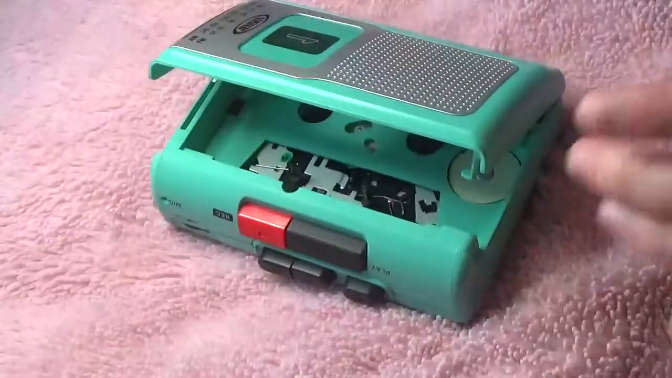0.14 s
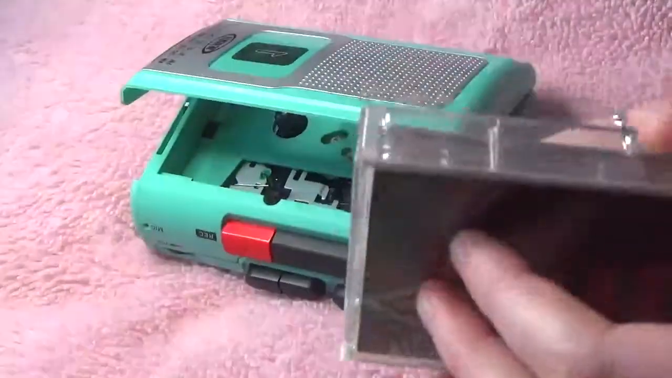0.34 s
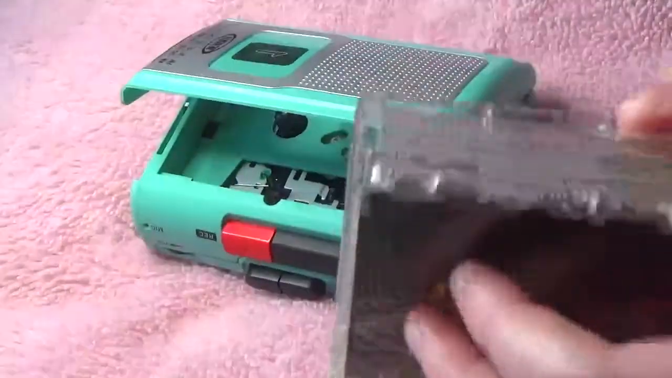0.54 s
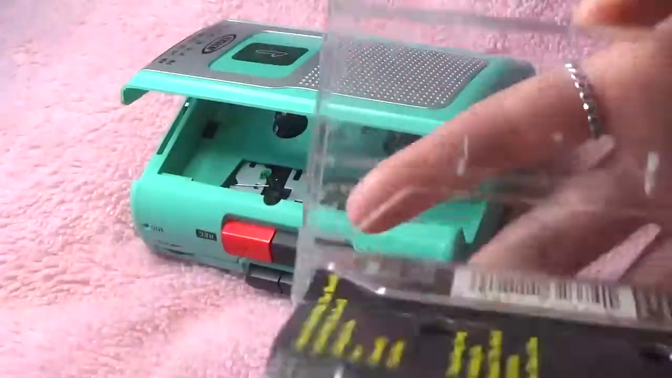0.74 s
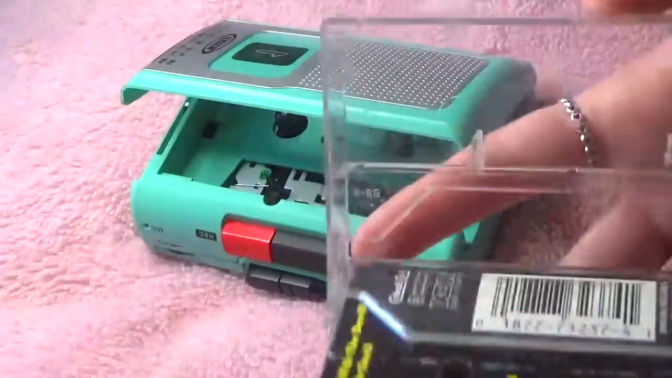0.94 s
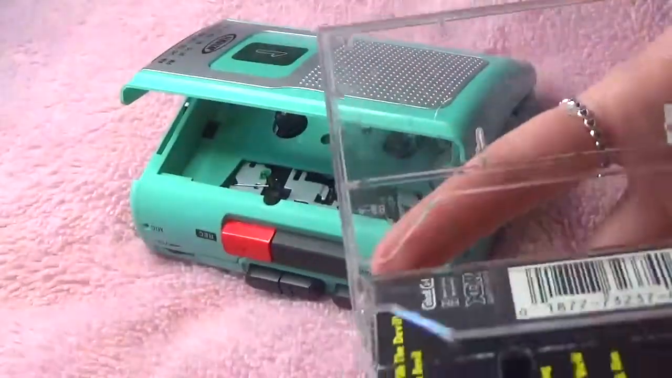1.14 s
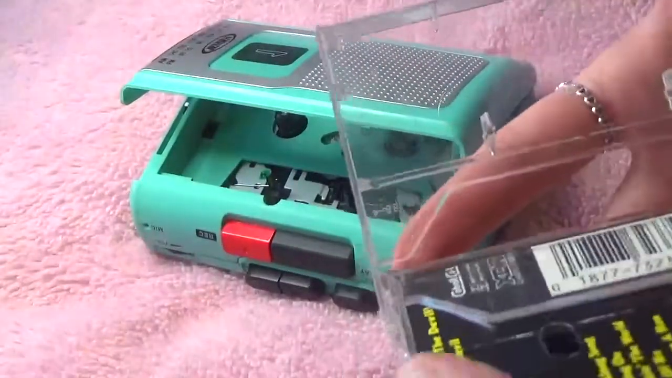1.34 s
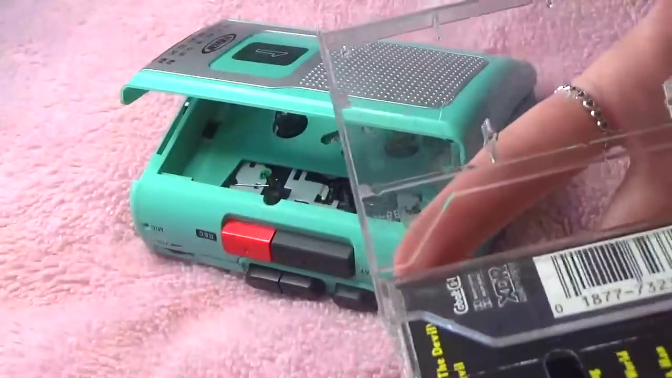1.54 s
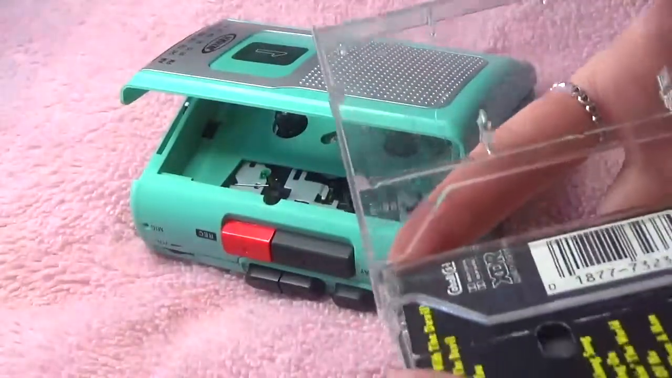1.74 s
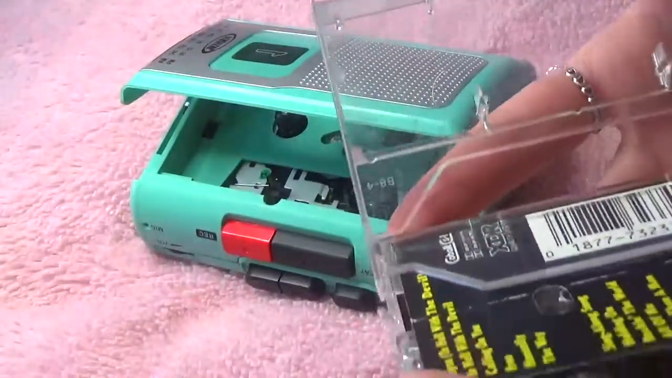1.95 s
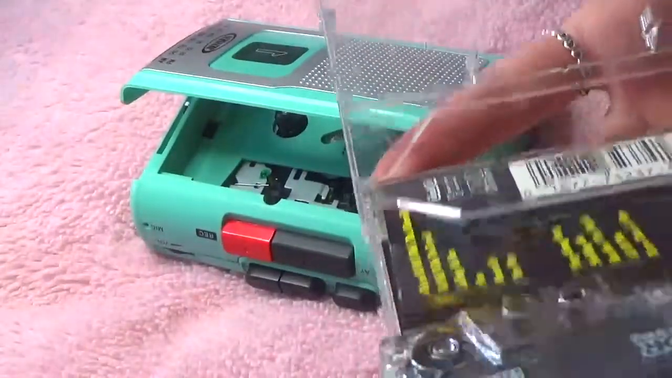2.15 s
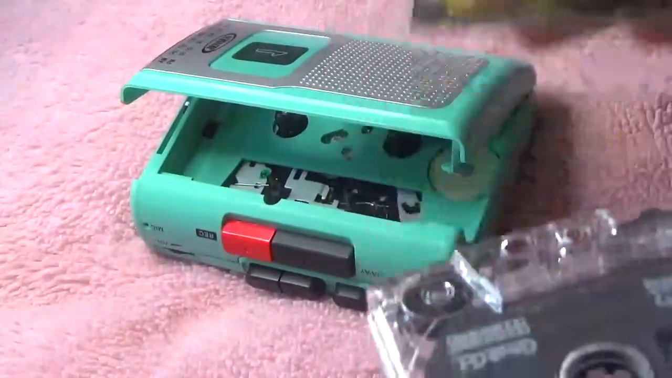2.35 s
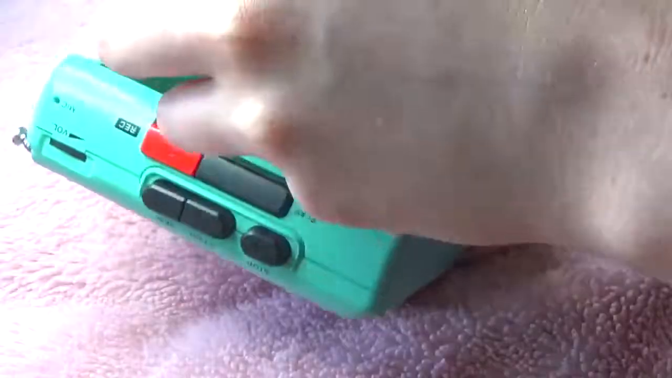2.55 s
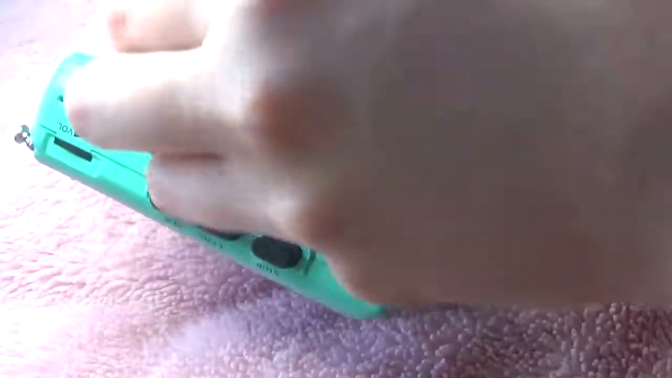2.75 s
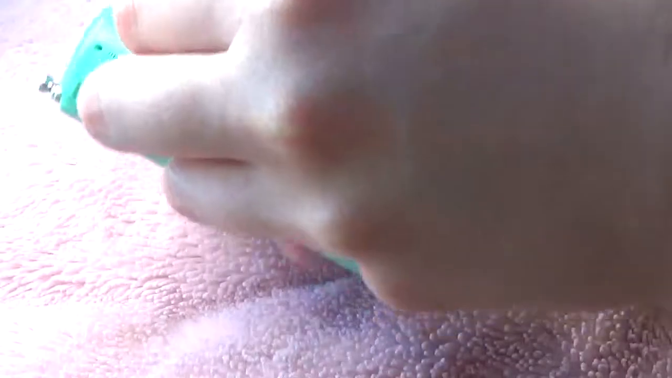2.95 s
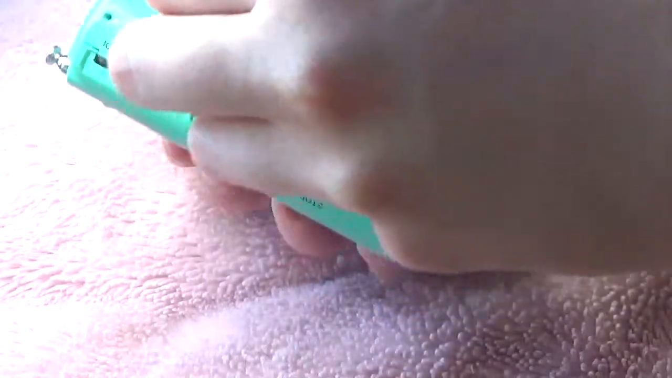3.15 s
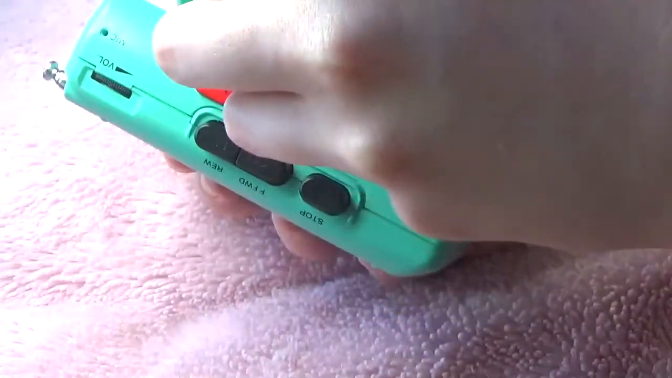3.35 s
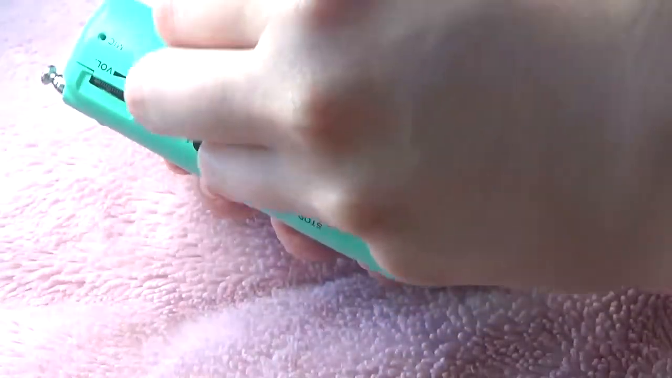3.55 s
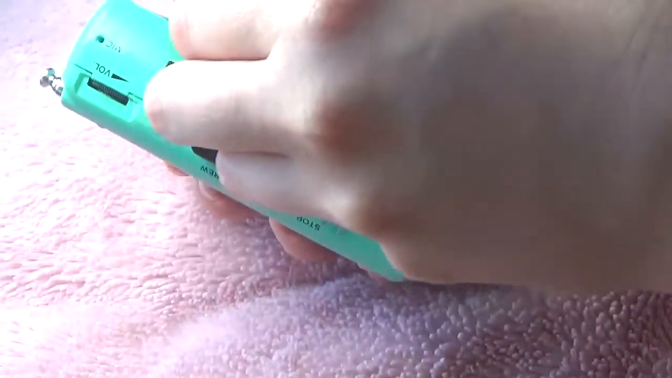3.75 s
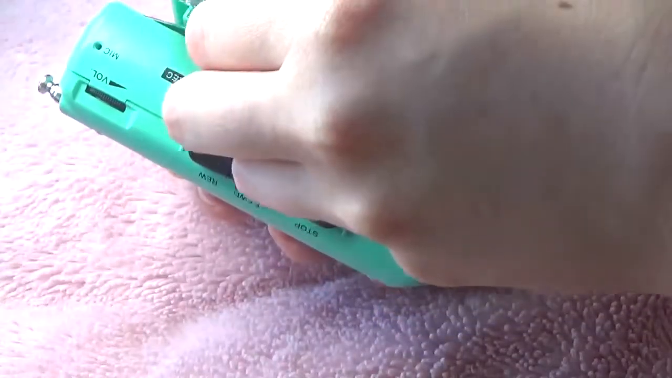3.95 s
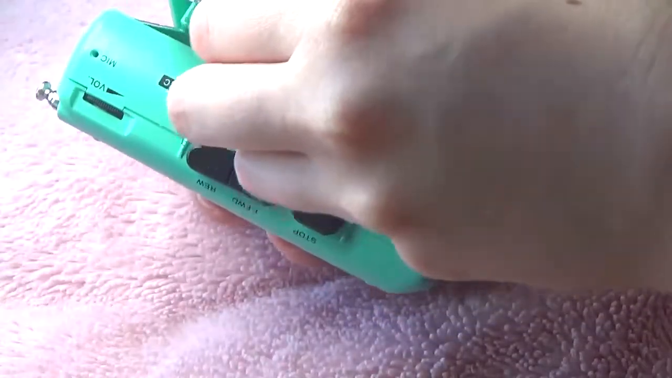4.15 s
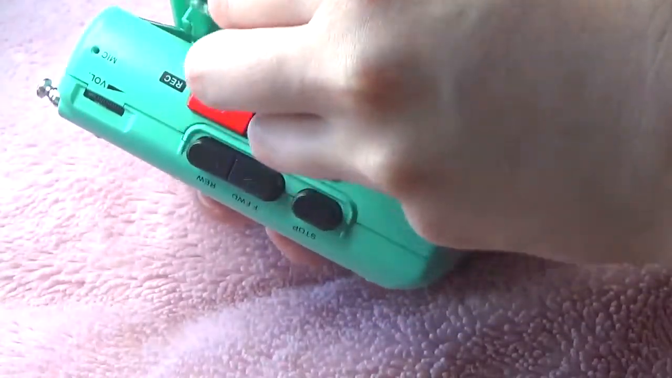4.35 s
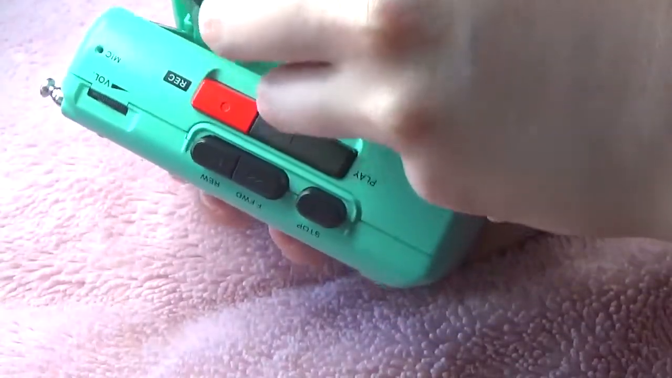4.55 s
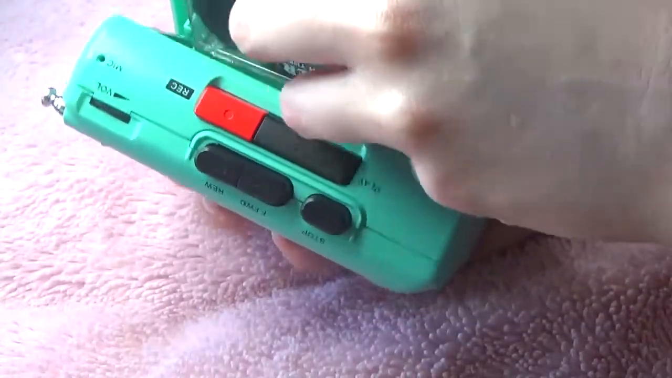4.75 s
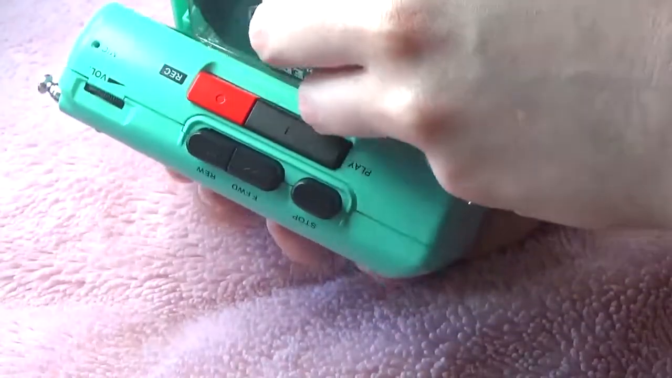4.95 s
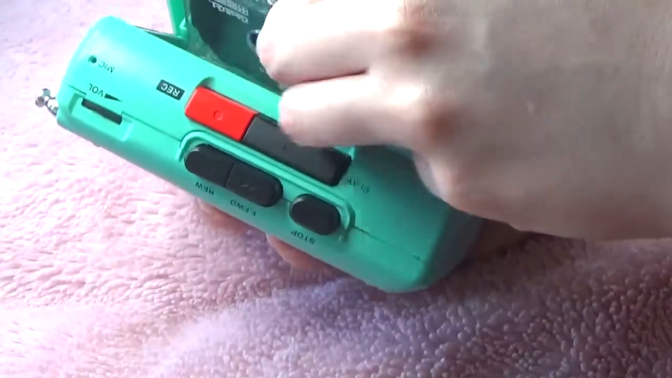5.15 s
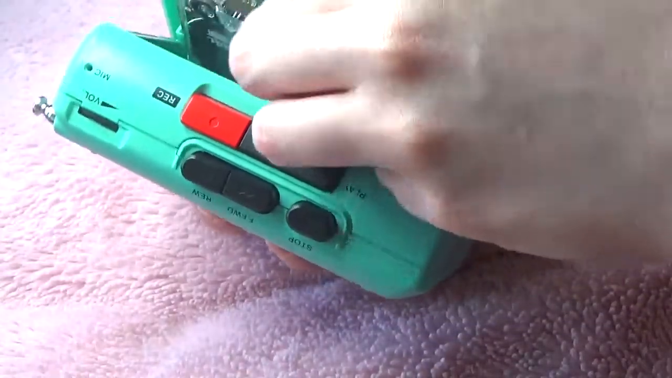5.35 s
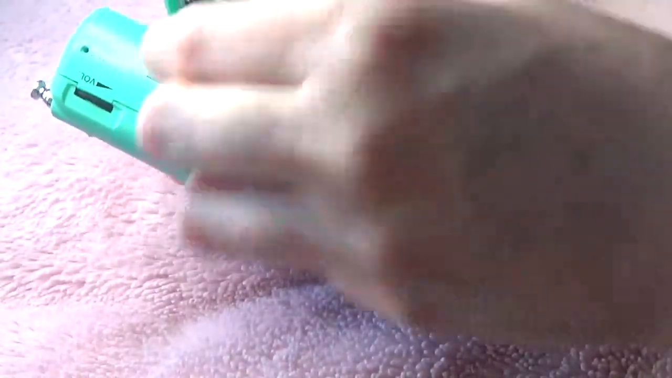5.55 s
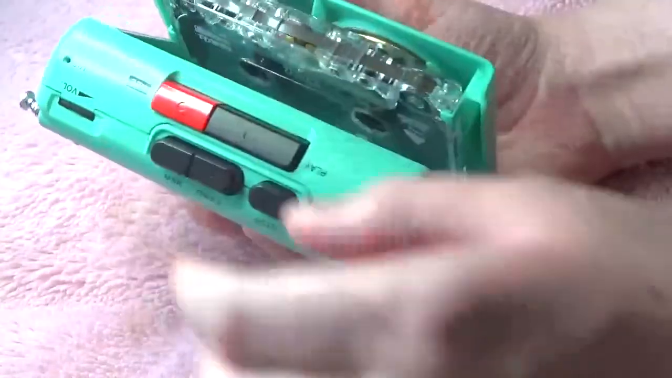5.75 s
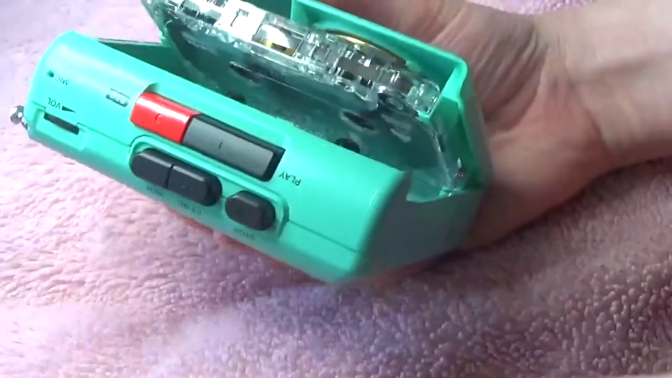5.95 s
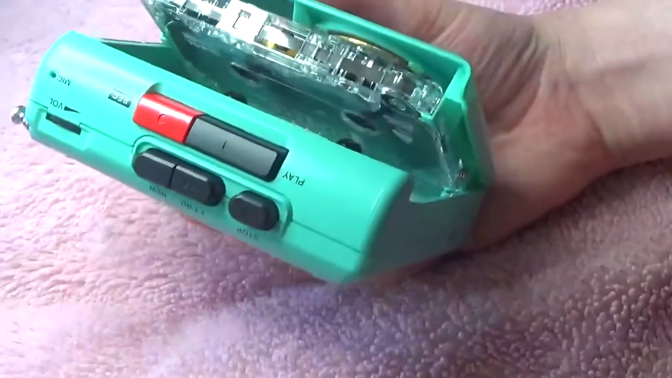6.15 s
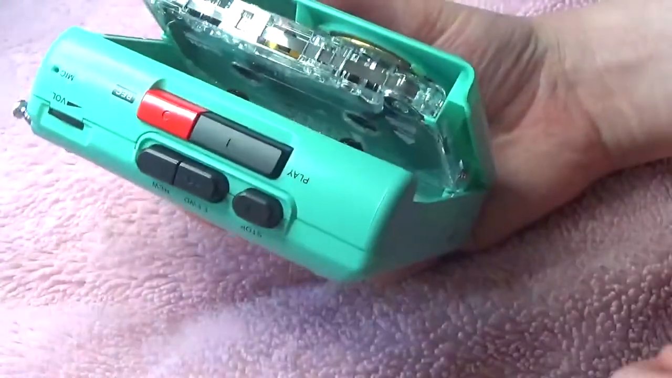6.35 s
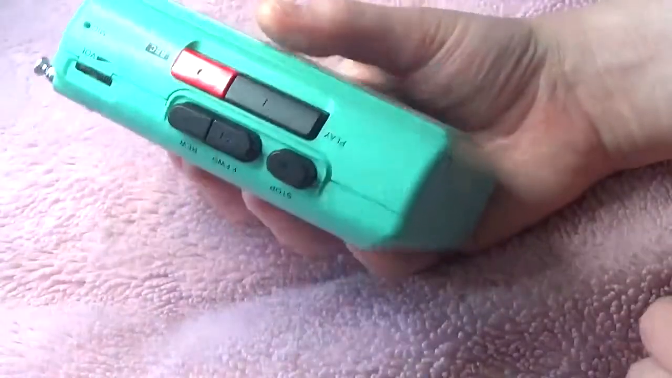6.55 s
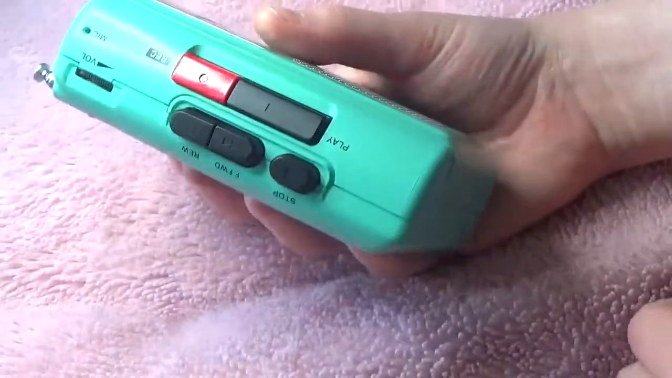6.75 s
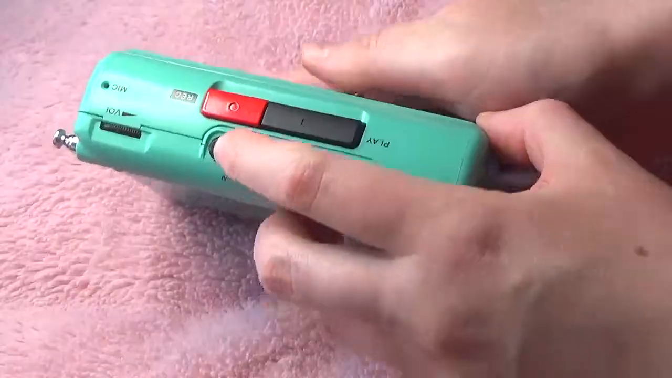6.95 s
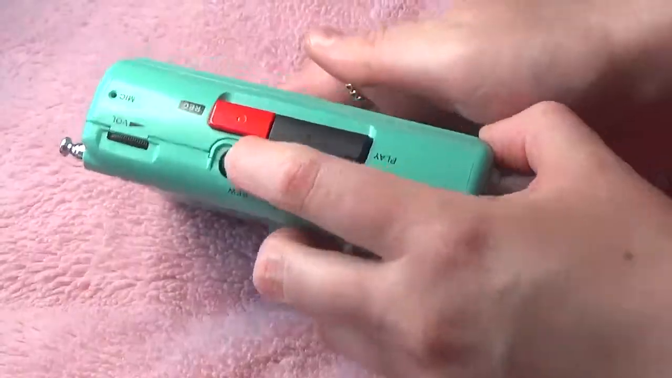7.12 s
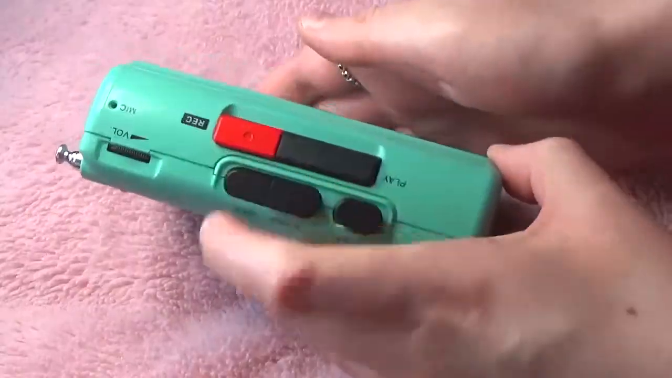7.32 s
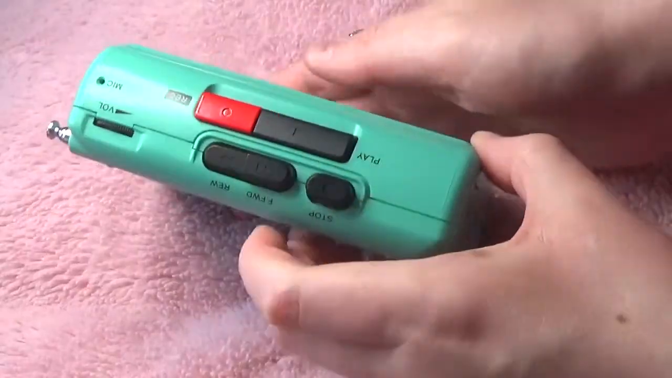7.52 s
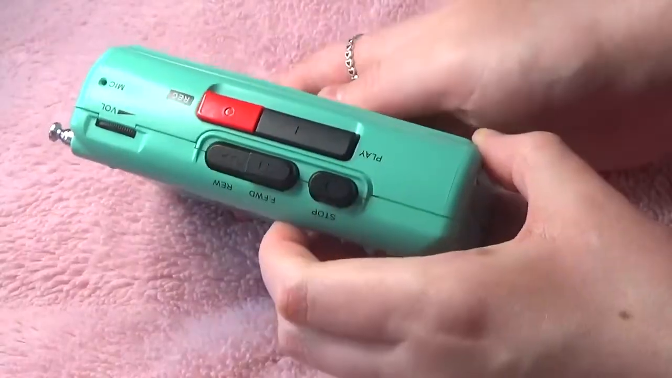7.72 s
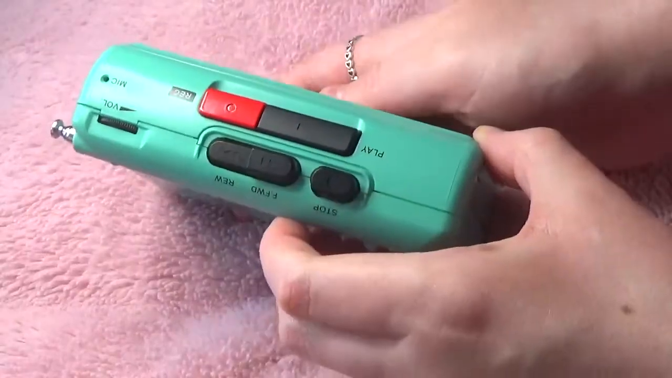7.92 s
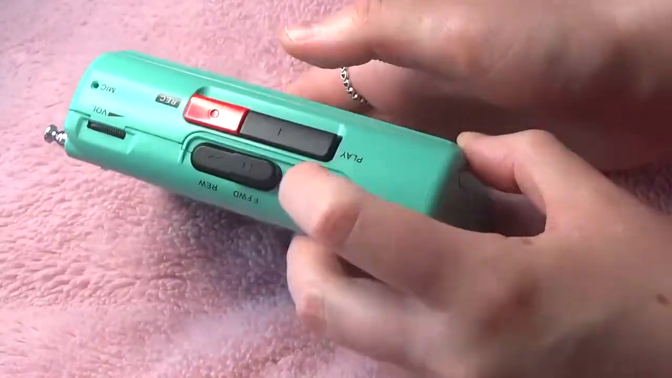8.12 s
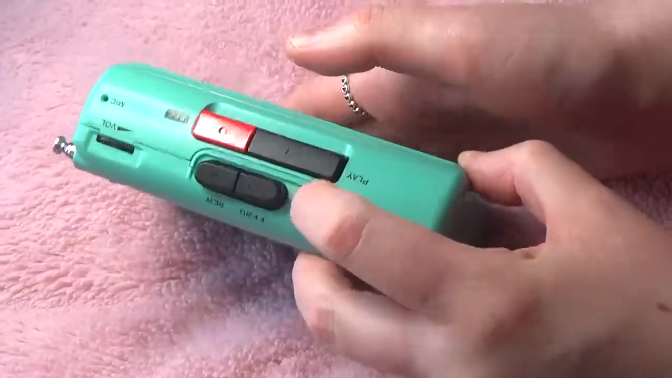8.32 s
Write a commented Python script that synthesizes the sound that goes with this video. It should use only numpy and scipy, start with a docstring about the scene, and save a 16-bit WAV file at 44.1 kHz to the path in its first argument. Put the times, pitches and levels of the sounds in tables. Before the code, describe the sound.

Close handling of a plastic cassette case and small player: clacks, a scraping tape slide, a lid snapping shut, key clicks and a brief motor whir.

```python
"""Tape loaded into a hand-held player

A tape slides out of its plastic case and into a small player on a towel; the lid snaps shut, a key clicks down,
the motor winds for a second and runs down, and a key clicks just after. Contacts are noise bursts through plastic
resonances, hands on skin and cloth are patchy noise, the slide is noise bands on moving pitches, the motor is
noise through gear resonances. The quiet room is damped; a camera close by hums, hisses and ticks once a frame."""
import sys
import numpy as np
from scipy import signal
from scipy.fft import rfft, irfft, next_fast_len
from scipy.io import wavfile
from scipy.ndimage import uniform_filter1d, map_coordinates

SR = 44100
rng = np.random.default_rng(int(sys.argv[2]) if len(sys.argv) > 2 else 0)


def master(y):
    """Save y as 16-bit WAV."""
    cut = np.clip(np.atleast_2d(y).T, -1, 1)
    pcm = np.round(cut * 32767)  # scale
    wavfile.write(sys.argv[1], SR, pcm.astype(np.int16))


N = 369558

# Camera air and circuit hiss. Each row: frequency in Hz, relative density in dB per Hz.
AIR_SPECTRUM = [(26, -23), (45, -4), (70, -6.5), (124, -10), (225, -13), (311, -15), (516, -16), (982, -18),
                (2410, -23), (2580, -25), (3180, -23), (3480, -26.5), (11000, -32.5), (14300, -64.5),
                (22000, -120)]
# Left-right correlation of that hiss. Each row: frequency in Hz, correlation from 0 to 1.
AIR_CORRELATION = [(60, 1.0), (170, 0.92), (490, 0.15), (1410, 0.038), (4030, 0.19), (11500, 0.92)]
# Camera hum. Each row: frequency in Hz, width in Hz, level in dB.
HUM_LINES = [(24, 10, -65.5), (119, 20, -68.5), (1001, 25, -81)]
# Low bump. Each row: centre in seconds, frequency in Hz, peak in dB, half length in seconds.
LOW_BUMPS = [(7.694, 88, -49, 0.018)]
# Wandering tone of the camera tick. Each row: time in seconds, frequency in Hz, mean level in dB.
TICK_TONE = [(0, 2600, -68), (3.12, 2620, -66), (3.25, 2620, -78), (4.6, 3050, -76), (5.3, 3080, -67),
             (6.4, 3150, -68), (6.7, 3410, -64), (6.87, 3430, -63), (6.95, 3450, -76), (8.4, 3450, -76)]
# Room decay. Each row: frequency in Hz, T60 in seconds.
ROOM_DECAY = [(200, 0.21), (1500, 0.13), (10000, 0.11)]
# Where the hands work. Each row: time in seconds, left over right in dB.
HANDS_PAN = [(0, -1), (2.3, -1.8), (2.55, .9), (3.5, .1), (8.4, .5)]
# Resonances of the running deck. Each row: frequency in Hz, width in Hz, relative level in dB.
GEAR_MODES = [(770, 240, 1), (1040, 340, 0), (2120, 260, 2), (2700, 600, -6), (3600, 420, 3),
              (8100, 900, -9), (9000, 600, -5), (10100, 300, -6)]
# Blows pushing the whole object into palm or towel. Each row: start in seconds, level in dB before THUD_TRIM_DB.
THUD_BLOWS = [(.518, -42.5), (2.168, -48), (2.584, -34.5), (3.837, -39.5), (4.02, -43.5), (4.109, -46),
              (4.355, -47), (4.395, -42.5), (4.603, -45.5), (4.644, -43), (5.085, -50), (5.249, -45),
              (5.292, -48), (6.503, -35.5), (6.544, -33), (7.036, -49)]
# Brushing on skin, case and cloth; the faint last row is the motor running down.
# Each row: start in seconds, end in seconds, hiss in dB, scrape in dB.
BRUSH_STROKES = [(-.02, 0.298, -61, -65.5), (0.356, 0.418, -62, -62), (.63, 0.866, -60.5, -57.5),
                 (0.927, 0.987, -54, -54), (1.032, 1.286, -52, -58), (1.312, 1.401, -67, -67),
                 (1.445, 1.5, -64.5, -68.5), (2.22, 2.374, -60, -60), (2.386, 2.47, -60.5, -57),
                 (2.538, 2.607, -63, -57), (4.986, 5.077, -64, -67), (5.175, 5.24, -60.5, -60.5),
                 (5.639, 5.891, -59, -65.5), (6.099, 6.255, -65.5, -71), (8.16, 8.216, -71, -68)]
# Skin hiss. Each row: frequency in Hz, relative density in dB per Hz.
SKIN_SPECTRUM = [(1760, -48.5), (3000, -9), (3980, -19), (4460, -9), (4870, -7), (6280, -7), (8850, 1),
                 (11000, -5.5), (14300, -45.5), (22000, -120)]
# Tape case under a finger. Each row: frequency in Hz, width in Hz, relative level in dB.
CASE_MODES = [(1800, 170, -1), (2580, 130, -4), (3700, 200, 0), (4400, 200, -3), (4950, 150, -7)]
# Tape leaving its case between two air pockets. Each row: time in seconds, hiss in dB, scrape in dB,
# shrinking pocket in Hz, growing pocket in Hz.
TAPE_SLIDE = [(1.62, -64.5, -70, 1100, 3390), (1.71, -41.5, -52, 1137, 3320),
              (1.82, -49, -57.5, 1205, 3247), (1.93, -44.5, -51.5, 1422, 3220),
              (2.0, -41, -45.5, 1750, 3000), (2.09, -46.5, -43.5, 1850, 2250),
              (2.135, -41.5, -41, 1795, 1362), (2.17, -62, -55, 1810, 1250)]
# Plastic on plastic. Each row: start in seconds, hollow knock, clack and tick in dB before CONTACT_TRIM_DB,
# rise in ms (11 dB gained in that time), T60 in ms.
PLASTIC_CONTACTS = [(0.359, -50.5, -48.5, -50, 3.6, 75), (0.4986, -35.5, -39, -49, 1.7, 42),
                    (0.5212, -13, -17, -28, 0.61, 16.5), (0.5477, -22, -14, -17, 4.7, 9.2),
                    (0.5612, -30, -39, -26, 1.3, 21), (0.6576, -51, -37.5, -31, 0.92, 36),
                    (.7801, -42, -41.5, -49, 0.9, 50), (.948, -60, -44, -31.5, 1.3, 20),
                    (0.9669, -25.5, -33.5, -38, .6, 26), (.991, -65, -52, -42, 4, 26),
                    (1.029, -42, -43, -25, 0.25, 14), (1.0877, -38.5, -34, -42, .6, 36),
                    (1.1137, -43, -49, -28, .3, 25), (1.1243, -42, -34, -35, 0.48, 20),
                    (1.1303, -31.5, -43, -51, 0.88, 26), (1.2646, -45, -46, -38, 2, 60),
                    (1.6536, -35, -42, -44, 0.94, 26), (1.6835, -48, -42, -34, 0.36, 46),
                    (2.1681, -55, -24, -24.5, 0.66, 11.6), (2.3885, -42, -30.5, -45, 1.5, 44),
                    (2.49, -43, -35, -39.5, 4, 14), (2.551, -31, -40.5, -45.5, 3.5, 150),
                    (2.585, -24, -20, -17, 0.55, 22), (2.6152, -38, -35, -28.5, 2.2, 25),
                    (3.8384, -28, -33.5, -41.5, 1.4, 39), (3.88, -37, -37, -39.5, 0.65, 33),
                    (4.0234, -36.5, -36, -35.5, 1.2, 47), (4.0993, -35, -34, -38, .9, 22),
                    (4.1106, -28, -33, -39, 2, 44), (4.278, -40.5, -49, -54, .6, 93),
                    (4.3358, -34.5, -35, -42, 2.1, 77), (4.355, -16.5, -17, -33, 0.5, 14),
                    (4.396, -23.5, -28, -27, 0.85, 34), (4.41, -24, -28.5, -25, 1.9, 37),
                    (4.605, -29.5, -33, -30, 0.35, 38), (4.614, -26.5, -27, -25, 0.38, 28),
                    (4.6463, -35, -30, -26, 1.7, 90), (4.6609, -24.5, -42, -18.5, 3.9, 43),
                    (4.7336, -31, -42, -52, 1.3, 30), (4.784, -44, -58, -53, 3.5, 30),
                    (5.082, -38.5, -37, -46, .8, 44), (5.211, -20.5, -26.5, -37, 1.9, 7.2),
                    (5.247, -23, -16.5, -12, 0.13, 67), (5.2752, -17.5, -21, -19, 0.57, 50),
                    (5.2964, -13, -30.5, -18, 2.2, 16), (5.314, -47, -48.5, -21.5, .7, 30),
                    (6.4756, -23, -33, -36, 1.4, 25), (6.5145, -6, -13, -33, 1.6, 6.6),
                    (6.5307, -15, -21, -28, 1.7, 40), (6.536, -15.5, -12, -9, 1.5, 23),
                    (6.926, -36, -32.5, -29, 0.58, 23), (6.9597, -44, -47, -50, 0.83, 120),
                    (6.9933, -37, -40.5, -37, 0.25, 46), (7.0373, -15, -15.5, -9.5, 2.14, 15),
                    (7.0727, -38, -35, -38, 0.98, 110), (7.0915, -42, -29.5, -20, 0.76, 22),
                    (7.2156, -32.5, -27.5, -34, 2.7, 23), (8.228, -17, -12, -10, 2.05, 17)]
# Drags and rattles; the faint rows at 8.139 s and 8.28 s are the motor running down.
# Each row: start in seconds, end in seconds, knock, clack and tick in dB before CONTACT_TRIM_DB.
DRAGS_AND_RATTLES = [(0.504, 0.564, -40.5, -38.5, -44), (0.659, .73, -56.5, -48, -53),
                     (0.926, 0.95, -52, -47.5, -47), (4.357, 4.377, -37, -40, -28),
                     (4.419, 4.427, -45, -40, -32), (4.62, 4.7, -45.5, -45.5, -30),
                     (4.728, 4.764, -44, -44.5, -39.5), (5.217, 5.232, -37.5, -40, -38.5),
                     (5.236, 5.246, -40.5, -40, -30), (5.252, 5.264, -21, -17.5, -12),
                     (5.279, 5.316, -29.5, -27.5, -22.5), (5.316, 5.341, -33.5, -33.5, -29),
                     (6.489, 6.502, -36, -24.5, -24), (6.499, 6.516, -17, -17, -13.5),
                     (6.539, 6.572, -32, -29, -25.5), (7.046, 7.07, -44, -40.5, -42),
                     (8.139, 8.2, -59.5, -68, -66), (8.236, 8.275, -40, -35, -31.5),
                     (8.28, 8.376, -53.5, -56, -59.5)]
# Bands of knock, clack and tick. Each row: lower edge in Hz, upper edge in Hz.
BAND_EDGES_HZ = [(560, 1940), (1650, 4100), (5200, 16500)]
# Closed shells: case, lid, keys. Each row: frequency in Hz, width in Hz, relative level in dB.
SHELL_MODES = [(764, 90, -10), (1086, 138, 4.5), (1467, 33, -9.5), (2088, 120, -4), (2820, 240, -9.5),
               (3360, 140, -17), (3903, 69, -12.5), (5840, 280, -19.5), (7060, 86, -13), (8130, 98, -11.5),
               (9380, 130, -16), (10300, 74, -32)]
# Open player with the loose tape. Each row: frequency in Hz, width in Hz, relative level in dB.
PLAYER_MODES = [(782, 73, -9.5), (1056, 103, 0.5), (1197, 70, -2.5), (1500, 100, -6.5), (2093, 150, -4),
                (2887, 180, -6), (3297, 120, -12.5), (3750, 60, -11.5), (6120, 170, -6.5),
                (6860, 118, -8.5), (8200, 110, -6), (9070, 180, -7), (10170, 200, -9)]

TOP_HZ = 10970
AIR_DB, TICK_RATE_HZ, STAYING_HZ, STAYING_DB = -60, 29.975, 3380, -71.5
ROOM_DB, ROOM_GAP_S = -11.5, 0.008
MOTOR_ON_S, MOTOR_OFF_S, MOTOR_DB, SPIN_UP_S, COAST_S = 6.96, 8.14, -55, 0.16, 0.023
SPOOL_RATE_HZ = 9.47
THUD_TRIM_DB, THUD_HZ, THUD_RISE_S, THUD_T60_S = 7.0, 330, 0.0014, 0.033
TOUCH_S, LIFT_S = 0.036, 0.025  # a stroke gains or loses 20 dB in these times
POCKET_DB = -1.5  # over the scrape
CONTACT_TRIM_DB, LEAD_S = -5.0, 0.02  # LEAD_S: room for the rise ahead of a contact
RATTLE_RISE_MS, RATTLE_T60_MS, RATTLE_FADE_DB, RATTLE_SCATTER_DB = 2, 46, 6, 2  # fade: loss while it lasts
LOADING_START_S, LOADING_END_S = 2.45, 6  # the tape goes into the open door


def amp(db):
    """dB to amplitude."""
    return 10 ** (np.asarray(db) / 20)


def unit(x):
    """Scale to RMS 1."""
    return x / np.sqrt(np.mean(x ** 2) + 1e-20)


def along(points, hz):
    """Interpolate (Hz, value) points on a log frequency axis."""
    f, v = np.transpose(points)
    return np.interp(np.log(hz + 1), np.log(f + 1), v)


def curves(rows):
    """One value per sample for each column after the time; -120 outside the rows."""
    s, *cols = np.transpose(rows)
    return [np.interp(np.arange(N) / SR, s, c, left=-120, right=-120) for c in cols]


def wobble(rate_hz):
    """Smooth random curve, rate_hz knots a second."""
    knots = rng.standard_normal(int(N * rate_hz / SR) + 4)
    return map_coordinates(knots, [np.arange(N) * rate_hz / SR])


def filtered(x, response):
    """Apply a complex response of frequency."""
    m = next_fast_len(N + SR // 2)
    return irfft(rfft(x, m) * response(np.fft.rfftfreq(m, 1 / SR)), m)[..., :N]


def modes(peaks, bed_db):
    """Causal resonances standing on an even bed."""
    def response(f):
        rings = sum(amp(db) * 1j * f * w / (c * c - f * f + 1j * f * w) for c, w, db in peaks)
        return amp(bed_db) + rings
    return response


def grit(rough_db):
    """White noise whose strength varies from grain to grain."""
    return unit(rng.standard_normal(N) * amp(rough_db * wobble(400)))


def coloured(x, spectrum):
    """Shape by a dB spectrum, RMS 1."""
    return unit(filtered(x, lambda hz: amp(along(spectrum, hz))))


def patchy(x, depth_db):
    """Random patches of gain over time and frequency; RMS 1."""
    z = signal.stft(x, nperseg=256)[2]
    field = uniform_filter1d(rng.standard_normal(z.shape), 3, 0)
    field = uniform_filter1d(field, 7, 1)
    return unit(signal.istft(z * amp(depth_db * unit(field)), nperseg=256)[1][:N])


def camera_air():
    """Stereo noise, mixed from mid and side to a set correlation at each frequency."""
    def mid_side(hz):
        angle = np.arccos(np.clip(along(AIR_CORRELATION, hz), -1, 1)) / 2
        return amp(along(AIR_SPECTRUM, hz)) * [np.cos(angle), np.sin(angle)]
    mid, side = filtered(rng.standard_normal((2, N)), mid_side)
    return amp(AIR_DB + 0.37 * wobble(2.105)) * unit(np.array([mid + side, mid - side]))


def camera_hum():
    """Tones wavering in amplitude and phase around a steady part."""
    t, out = np.arange(N) / SR, np.zeros(N)
    for hz, width_hz, db in HUM_LINES:
        phase = 2 * np.pi * hz * t
        out += amp(db) * unit(wobble(width_hz) * np.cos(phase) + (1 + wobble(width_hz)) * np.sin(phase))
    return out


def low_bump():
    """A low tone under a bell-shaped envelope."""
    t = np.arange(N) / SR
    return sum(amp(db) * np.exp(-((t - s) / half_s) ** 2) * np.sin(2 * np.pi * hz * t)
               for s, hz, db, half_s in LOW_BUMPS)


def ticking():
    """A faint pitched tick once a frame: one tone wanders, another keeps its pitch."""
    t, (hz, db) = np.arange(N) / SR, curves(TICK_TONE)
    frame = ((t - .0155) * TICK_RATE_HZ + .5) % 1 - .5
    phase = 2 * np.pi * np.cumsum(hz * (1 + .008 * wobble(15))) / SR
    wandering = amp(db + 3 * wobble(20)) * np.sin(phase)
    staying = amp(STAYING_DB + 3.5 * wobble(15)) * np.sin(2 * np.pi * STAYING_HZ * t)
    return np.exp(-(frame / 0.15) ** 2) * (wandering + staying)


def camera():
    """Air and circuit hiss, wavering hum, low bump and ticks."""
    return camera_air() + camera_hum() + low_bump() + ticking()


def room(x):
    """The walls answer after a short gap; each frequency dies at its own speed."""
    hz, t, z = signal.stft(rng.standard_normal((2, SR // 3)), SR, nperseg=256)
    decay = amp(-60 * t / along(ROOM_DECAY, hz)[:, None])
    tail = signal.istft(z * decay, SR, nperseg=256)[1]
    tail /= np.linalg.norm(tail, axis=1, keepdims=True)
    late = np.pad(x, (round(ROOM_GAP_S * SR), 0))
    return signal.fftconvolve(late[None], tail, axes=1)[:, :N]


def motor():
    """Gear noise flutters in the deck's steep resonances; a spool knocks once a turn."""
    t = np.arange(N) / SR
    spin_up = 1 - np.exp(-np.maximum(t - MOTOR_ON_S, 0) / SPIN_UP_S)
    coast = np.exp(-(np.maximum(t - MOTOR_OFF_S, 0) / COAST_S) ** 2)
    turn = (t - 7.636) * SPOOL_RATE_HZ % 1
    knock = 1 + 1.3 * np.exp(-turn / .035)

    def deck(f):
        power = sum(amp(2 * db) / (1 + (2 * (f - c) / w) ** 2) ** 2 for c, w, db in GEAR_MODES)
        return np.sqrt(amp(-22.5) + power)
    gears = patchy(filtered(grit(rough_db=1.5) * knock, deck), depth_db=1.5)
    return amp(MOTOR_DB) * spin_up * coast * gears


def thuds():
    """A soft push: two damped low partials, the upper about 1.5 times the lower, pitches varying at random."""
    out, t = np.zeros(N + SR), np.arange(SR // 10) / SR
    for s, db in THUD_BLOWS:
        low_hz, high_hz = THUD_HZ * np.exp(rng.normal(0, [.15, .15])) * [1, 1.5]
        swing = np.sin(2 * np.pi * low_hz * t) + .5 * np.sin(2 * np.pi * high_hz * t)
        envelope = amp(db + THUD_TRIM_DB - 60 * t / THUD_T60_S) * (1 - np.exp(-t / THUD_RISE_S))
        out[round(s * SR):][:len(t)] += envelope * swing
    return out[:N]


def strokes():
    """Gains of hiss and scrape: each stroke rises, holds and falls; the slide joins in."""
    t, gains = np.arange(N) / SR, amp(curves(TAPE_SLIDE)[:2])
    for start, end, *db in BRUSH_STROKES:
        shape_db = -20 * np.maximum(0, np.maximum((start - t) / TOUCH_S, (t - end) / LIFT_S))
        gains = gains + amp(db)[:, None] * amp(shape_db)
    return gains


def rubbing():
    """Fine skin hiss and a coarser scrape that rings the case follow each stroke."""
    fine, coarse = strokes()
    skin = patchy(coloured(grit(rough_db=-1.0), SKIN_SPECTRUM), depth_db=3.5)

    def wall(f):
        high_pass = (1j * f / (700 + 1j * f)) ** 2
        return modes(CASE_MODES, bed_db=-7)(f) * high_pass / (1 + 1j * f / 5500) ** 2
    scrape = patchy(filtered(grit(rough_db=1.0), wall), depth_db=5.5)
    return fine * amp(0.77 * wobble(32)) * skin + coarse * amp(1.5 * wobble(25)) * scrape


def pocket():
    """The tape's scrape excites both air pockets and a low panel: noise bands on moving pitches."""
    scrape_db, shrinking_hz, growing_hz = curves(TAPE_SLIDE)[1:]

    def band(hz, rate_hz):
        phase = 2 * np.pi * np.cumsum(np.abs(hz) * (1 + .05 * wobble(30))) / SR
        return wobble(rate_hz) * np.cos(phase) + wobble(rate_hz) * np.sin(phase)
    panel = amp(-14.5) * band(425, 50)
    air = band(shrinking_hz, 550) + band(growing_hz, 800) + panel
    return amp(scrape_db + POCKET_DB + 1.6 * wobble(40)) * patchy(air, depth_db=5.5)


def struck(peaks):
    """Resonances at a new spot: pitches, widths and strengths (dB) shift at random."""
    shift = 1 + rng.normal(0, [.012, .2, 0], (len(peaks), 3))
    return peaks * shift + rng.normal(0, 3, (len(peaks), 1)) * [0, 0, 1]


def contacts():
    """Each contact is a burst of chatter ringing the plastic at a new spot; a drag or rattle holds on."""
    out, size = np.zeros(N + SR), 8192
    t, hz = np.arange(size) / SR - LEAD_S, np.fft.rfftfreq(size, 1 / SR)
    filters = [signal.butter(3, edges, "bandpass", fs=SR, output="sos") for edges in BAND_EDGES_HZ]
    bands = [signal.sosfreqz(sos, hz, fs=SR)[1] for sos in filters]
    single = [(s, 0, *rest) for s, *rest in PLASTIC_CONTACTS]
    held = [(s, end - s, *db, RATTLE_RISE_MS, RATTLE_T60_MS) for s, end, *db in DRAGS_AND_RATTLES]
    for s, hold_s, *db, rise_ms, t60_ms in single + held:
        rise = np.exp(1300 * np.minimum(t, 0) / max(rise_ms, .1))
        burst = rise * amp(-60000 * np.maximum(t - hold_s, 0) / max(t60_ms, 5))
        if hold_s:
            jolts = np.repeat(rng.standard_normal(size // 128), 128)
            burst *= amp(RATTLE_SCATTER_DB * jolts - RATTLE_FADE_DB * np.clip(t / hold_s, 0, 1))
        loading = LOADING_START_S < s < LOADING_END_S
        spot = struck(PLAYER_MODES if loading else SHELL_MODES)
        grains = np.repeat(rng.standard_normal(size // 16), 16)
        chatter = rng.standard_normal(size) * amp(3 * grains)
        chatter[round(LEAD_S * SR)] = 2.5 / max(rise_ms, .2)  # the faster the rise, the stronger the crack
        parts = irfft(rfft(burst * chatter) * modes(spot, bed_db=-15)(hz) * bands, size)
        parts *= np.linalg.norm(burst) / np.linalg.norm(parts, axis=1, keepdims=True)
        out[round((s - LEAD_S) * SR):][:size] += amp(db) @ parts
    return amp(CONTACT_TRIM_DB) * out[:N]


def scene():
    """Panned hands and motor, their room answer, and the camera."""
    hands = contacts() + thuds() + rubbing() + pocket() + motor()
    pan_db = curves(HANDS_PAN)[0] / 2
    return hands * amp([pan_db, -pan_db]) + amp(ROOM_DB) * room(hands) + camera()


def record(dry):
    """The camera's band ends steeply: a 38 dB cliff, then a slower slope."""
    def band_end(hz):
        cliff_db = np.clip((hz - TOP_HZ) / 3.5, 0, 38)
        slope_db = np.clip(hz - TOP_HZ, 0, 5000) / 100
        return amp(-cliff_db - slope_db)
    return filtered(dry, band_end)


dry = scene()
out = record(dry)
master(out)
```